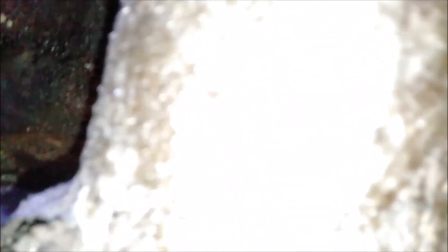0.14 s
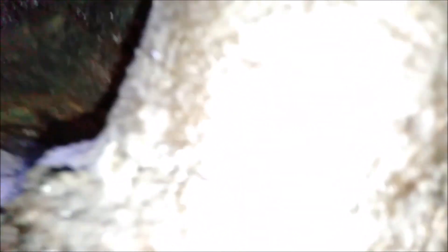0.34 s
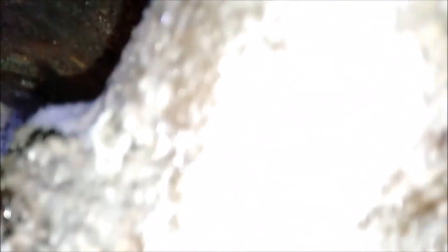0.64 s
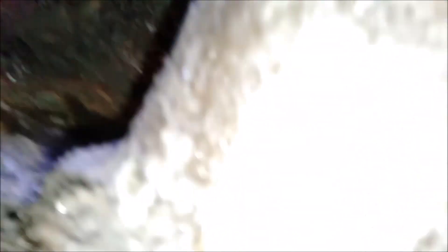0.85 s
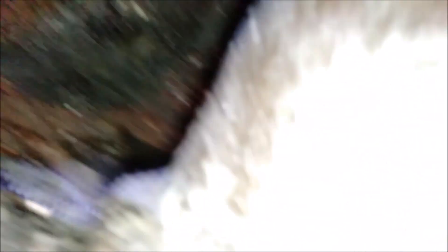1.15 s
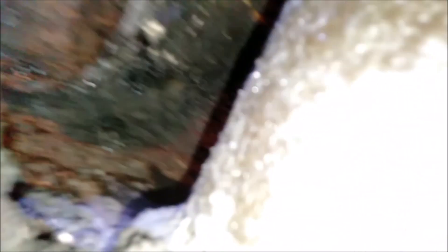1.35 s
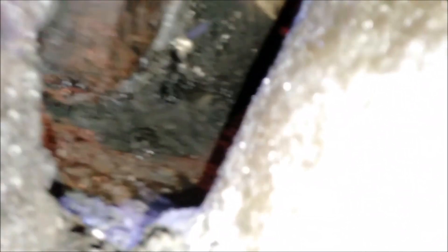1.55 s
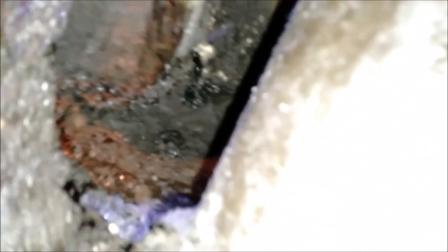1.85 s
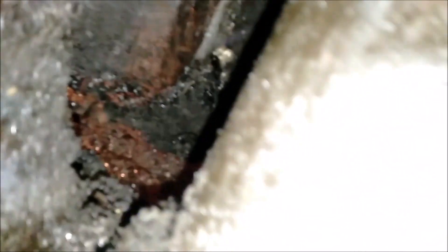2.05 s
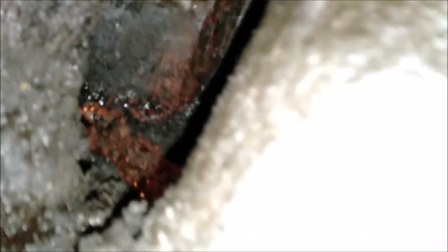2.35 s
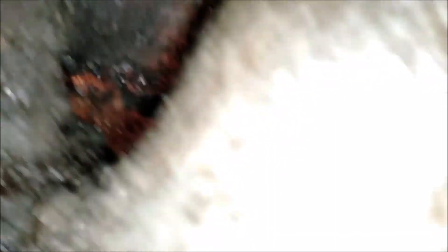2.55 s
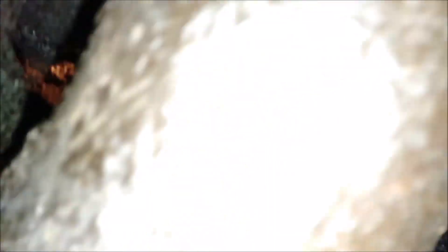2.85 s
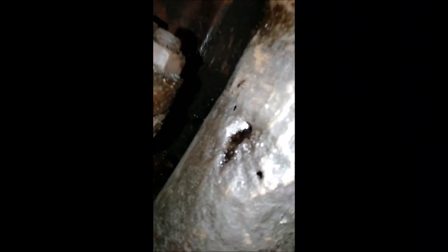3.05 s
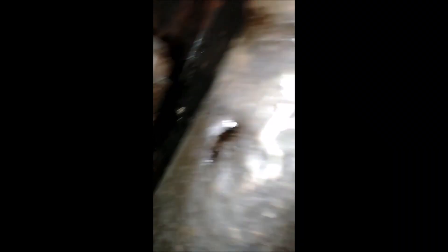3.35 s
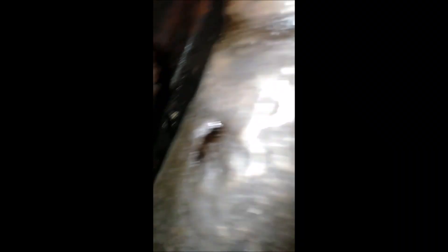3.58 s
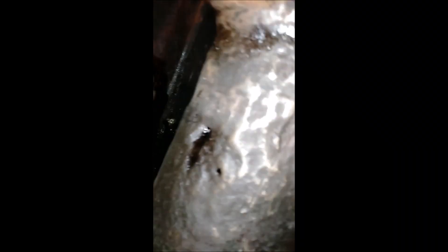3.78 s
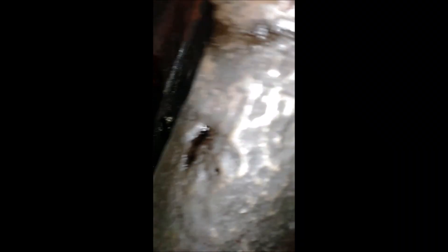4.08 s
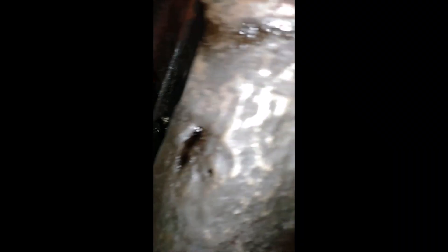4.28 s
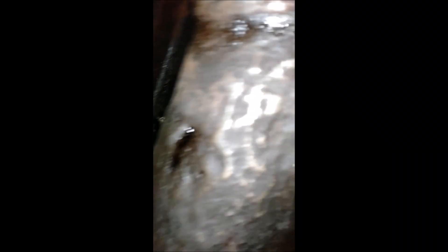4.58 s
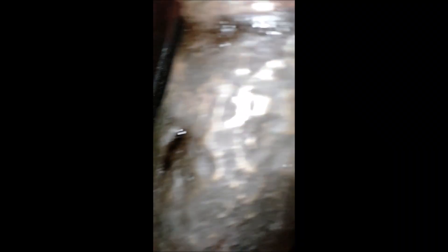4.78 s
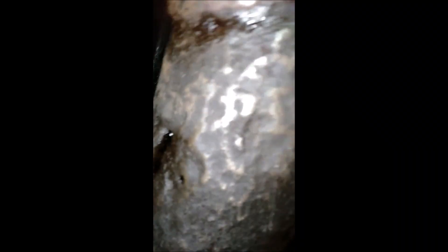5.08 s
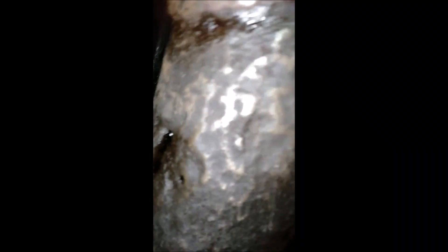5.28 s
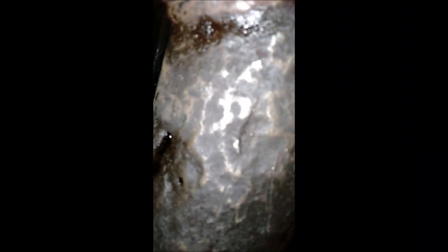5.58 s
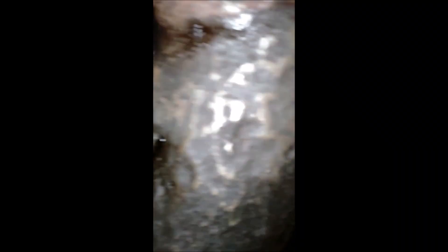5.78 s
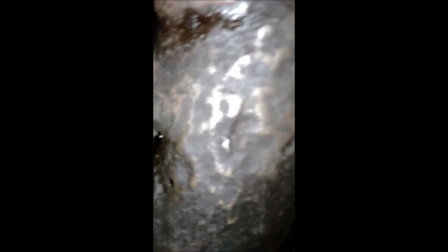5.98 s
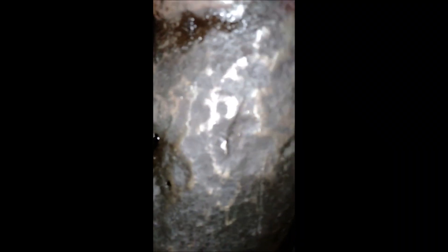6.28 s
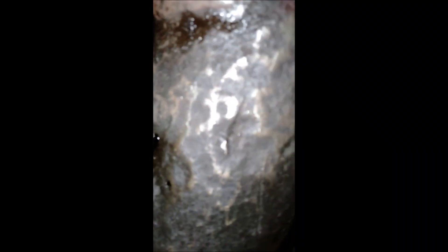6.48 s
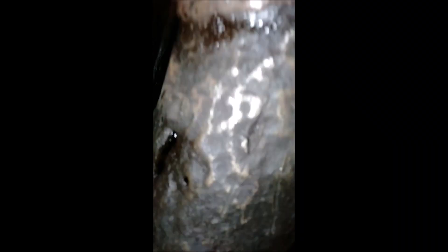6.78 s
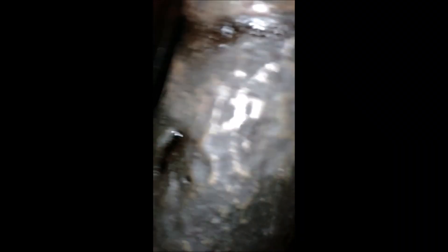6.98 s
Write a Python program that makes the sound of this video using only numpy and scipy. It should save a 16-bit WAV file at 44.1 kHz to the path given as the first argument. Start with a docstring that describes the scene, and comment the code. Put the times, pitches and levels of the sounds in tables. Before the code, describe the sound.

A diesel engine drones loudly up close with valve clatter and hiss, cuts to brief silence, then two engines rumble together, duller and boomier.

```python
"""A diesel drones close by in a ship's engine room, its cycle repeating about six times a second
under valve clatter and hiss; after a short silence comes a duller second scene, where a slow and
a faster diesel beat together over booming rumble. Engines are tones locked to a shaft plus cyclic
and random forces ringing through casings and panels; hiss is coloured noise."""
import sys
import numpy as np
from scipy import signal
from scipy.fft import rfft, irfft
from scipy.io import wavfile
from scipy.ndimage import uniform_filter1d, minimum_filter1d

SR = 44100
rng = np.random.default_rng(int(sys.argv[2]) if len(sys.argv) > 2 else 0)


def put_to_file(sound):
    """Save the sound as 16-bit audio at rate SR, in the file named by the first command-line argument."""
    columns = np.atleast_2d(sound).T  # one column per channel
    safe = np.clip(columns, -1, 1)
    whole_steps = np.round(safe * 32767)
    wavfile.write(sys.argv[1], SR, whole_steps.astype(np.int16))


N = 314428
TIME = np.arange(N) / SR
FREQS = np.fft.rfftfreq(N, 1 / SR)
NEAR_END_S, DULL_START_S = 2.995, 3.2665
WAVER_DB = 1.7   # spread of a tone's level


def near_diesel():
    """One close engine and its pump motors: shaft tones, casing din and sizzle, with bands that swell and ebb."""
    cycle_hz = 5.957   # four-stroke cycles
    # Engine orders that stand out as tones. Each row: multiple of the cycle rate, relative level in dB.
    strong_orders = [(5, -38), (10, -40), (12, -34), (14, -35), (18, -30), (20, -33), (21, -35.5),
                     (22, -37), (24, -32.5), (25, -40), (36, -34.5), (39, -39), (42, -30), (69, -41),
                     (72, -41), (75, -42), (78, -40), (82, -34), (84, -31.5), (87, -36), (89, -40.5),
                     (90, -38.5), (94, -39.5), (98, -41), (99, -36.5), (105, -41.5), (140, -44), (149, -46),
                     (160, -43), (162, -42)]
    # Steady tones at fixed pitch: a line near thirty times the cycle rate, and the tones of the pumps and their
    # motors. Each row: frequency in Hz, relative level in dB.
    steady_tones = [(120, -39.5), (178, -36.5), (207, -36.5), (506.5, -36.5), (609.6, -35.5), (914.5, -43),
                    (2006, -60)]
    # Colour of casings and steel room. Each row: frequency in Hz, relative density in dB per Hz.
    body_colour = [(20, -48.5), (60, -46.5), (135, -44.5), (200, -48.5), (290, -50.5), (370, -53.5),
                   (520, -50), (740, -56), (900, -55), (1300, -60), (1900, -65.5), (2800, -77.5),
                   (4500, -84.5), (8000, -110)]
    # Colour of the air hiss. Each row: frequency in Hz, relative density in dB per Hz.
    hiss_colour = [(2000, -82), (4000, -96.5), (5400, -83.5), (6500, -78.5), (8000, -89.5), (10500, -95.5),
                   (13200, -94), (15600, -82)]
    # Ringing steel panels. Each row: frequency in Hz, width in Hz, lift in dB.
    ringing_panels = [(165, 20, 3), (215, 20, 3), (320, 25, 4), (502, 18, 6), (562, 16, 4), (606, 20, 4),
                      (834, 16, 4), (890, 16, 2.5), (914, 14, 4), (964, 22, 3.5), (1030, 16, 3.5),
                      (1211, 70, 3.5), (1740, 40, 3), (1829, 25, 3), (2006, 45, 2), (2435, 50, 3.5)]
    # Resonances of the opening sizzle. Each row: frequency in Hz, width in Hz, relative level in dB.
    sizzle_bands = [(1800, 500, -41), (2420, 120, -49), (2860, 450, -47), (3500, 400, -55)]
    # Resonances of a brief whistle in the hiss. Each row: frequency in Hz, width in Hz, peak level in dB.
    whistle_bands = [(5420, 140, -56), (6150, 160, -58)]
    # Surges of the drone. Each row: centre in seconds, reach to either side in seconds, lift in dB.
    drone_surges = [(0.34, 0.1, 1.8), (0.97, 0.14, 2.8), (1.25, 0.06, 4), (1.5, 0.1, 4), (1.89, 0.06, 4.3),
                    (2.05, 0.09, 5), (2.32, 0.045, 3.5), (2.48, 0.05, 2.5), (2.8, 0.17, 3)]

    # louder and sizzling at first, then settled
    opening = 1 / (1 + (TIME / 0.6) ** 8)
    # the microphone drifts through a spot where the mids are stronger
    spot = swell(at_s=1.96, reach_s=0.83)
    body_db = -1 + 0.9 * opening
    mid_db = -1.25 + 2.5 * spot
    hiss_db = -2 + 2.3 * opening

    turned = crank(cycle_hz, wander_s=0.00006)
    repeated = shaking(turned, cycle_hz, strong_orders, scatter_db=5.5)
    knocks = clatter(turned, depth=0.21, decay_s=0.0081, uneven_db=1.0)
    engine_tones = from_db(0.27) * hum(turned, strong_orders, WAVER_DB)
    pump_tones = hum(TIME, steady_tones, WAVER_DB)
    sizzle = opening * singing(sizzle_bands)
    whistle = swell(at_s=1.5, reach_s=0.21) * singing(whistle_bands)
    casing_din = din(repeated, knocks, body_colour, ringing_panels, hiss_colour,
                     [body_db, mid_db, hiss_db], flutter_db=0.85)
    engine = engine_tones + pump_tones + sizzle + whistle + casing_din

    # as the microphone moves along the engine, the growl above the drone fades and the bass grows
    from_middle_s = np.minimum(TIME, NEAR_END_S) - NEAR_END_S / 2
    growl_db_per_s, bass_db_per_s = -1.76, 0.9
    engine = rebalanced(engine, (550, 760), growl_db_per_s * from_middle_s)
    engine = rebalanced(engine, (15, 70), bass_db_per_s * from_middle_s)

    # the microphone crosses a node of the room, where the low mids thin out
    node_db, away_db = -2, 2.5
    low_mid_db = away_db + (node_db - away_db) * swell(at_s=1.48, reach_s=0.98)
    engine = rebalanced(engine, (270, 455), low_mid_db)

    between_surges_db = -1.5
    drone_db = between_surges_db + sum(db * swell(s, reach_s) for s, reach_s, db in drone_surges)
    return rebalanced(engine, (475, 520), drone_db)


def two_diesels():
    """Two engines at unrelated speeds: two sets of shaft tones and shared din, with a swelling hum."""
    slow_hz, fast_hz = 4.468, 6.349   # four-stroke cycles
    # Slow engine's tonal orders. Each row: multiple of the cycle rate, relative level in dB.
    slow_orders = [(4, -35), (6, -30), (8, -36), (12, -34), (14, -29.5), (24, -39), (29, -36), (30, -35),
                   (33, -37), (34, -38), (40, -43), (54, -39.5), (58, -43.5)]
    # Fast engine's tonal orders. Each row: multiple of the cycle rate, relative level in dB.
    fast_orders = [(5, -38), (20, -27.5), (24, -41), (36, -31), (38, -41), (40, -42.5), (42, -42.5),
                   (47, -44), (49, -44), (64, -46.5), (72, -51), (96, -57.5)]
    # Colour of casings and steel room. Each row: frequency in Hz, relative density in dB per Hz.
    body_colour = [(15, -48.5), (40, -40), (60, -42.5), (88, -45), (140, -40), (190, -48), (250, -46),
                   (350, -54.5), (500, -56.5), (700, -70), (950, -76), (1650, -72), (2200, -87),
                   (3500, -96.5)]
    # Colour of the air hiss. Each row: frequency in Hz, relative density in dB per Hz.
    hiss_colour = [(1500, -100), (2600, -89), (3450, -86), (4000, -75), (4250, -76.5)]
    # Ringing steel panels. Each row: frequency in Hz, width in Hz, lift in dB.
    ringing_panels = [(134, 13, 6.9), (222, 11, 0.94), (398, 8.2, 1.7), (616, 5.4, 3.1), (1590, 150, 2)]
    # Treble as the microphone moves; only its swing counts. Each row: time in seconds, relative level in dB.
    treble_curve = [(3.45, -51), (5.6, -53.5), (5.91, -56.5), (6.35, -55.5), (6.7, -56), (7.05, -55)]
    # Flare at the top of the hiss. Each row: frequency in Hz, width in Hz, relative level in dB.
    puff_bands = [(4050, 500, -46)]
    # Swells of the hum. Each row: centre in seconds, lift in dB.
    hum_swells = [(3.32, 3.5), (3.9, 4), (4.53, 3.5), (5.38, 2.2), (6.0, 1.4), (6.6, 2.5), (7.07, 3)]

    treble_s, treble_db = np.transpose(treble_curve)
    swing_db = np.interp(TIME, treble_s, treble_db) - np.mean(treble_db)
    # the lower bands follow part of the swing
    body_db = -0.95 + 0.32 * swing_db
    mid_db = -0.37 + 0.52 * swing_db
    hiss_db = -0.8 + swing_db

    slow = crank(slow_hz, wander_s=0.00036)
    fast = crank(fast_hz, wander_s=0.00015)
    slow_shaking = shaking(slow, slow_hz, slow_orders, scatter_db=6.5)
    fast_shaking = shaking(fast, fast_hz, fast_orders, scatter_db=8.5)
    repeated = (slow_shaking + fast_shaking) / np.sqrt(2)
    knocks = clatter(fast, depth=0.22, decay_s=0.006, uneven_db=1.5)

    tones = hum(slow, slow_orders, WAVER_DB) + hum(fast, fast_orders, waver_db=0.0)
    tones = from_db(-0.76) * tones
    deep = shaped(tones, below(85, order=6))
    tones = tones - deep + from_db(1.8) * deep   # throb of the deepest orders

    casing_din = din(repeated, knocks, body_colour, ringing_panels, hiss_colour,
                     [body_db, mid_db, hiss_db], flutter_db=0.47)
    engines = tones + casing_din
    ring_s = 5.57
    # the low mids swell along with the ring
    engines = rebalanced(engines, (300, 450), 2.5 * swell(ring_s, reach_s=0.48))
    # the hum's upper octave starts strong and settles
    engines = rebalanced(engines, (205, 260), 1 * swell(DULL_START_S, reach_s=1))
    between_swells_db = -1.6
    hum_db = between_swells_db + sum(db * swell(s, reach_s=0.12) for s, db in hum_swells)
    engines = rebalanced(engines, (112, 156), hum_db)
    puff = swell(at_s=6.82, reach_s=0.075) * singing(puff_bands)
    return engines + rumble() + puff + passing_ring(ring_s)


def crank(cycle_hz, wander_s):
    """Cycles turned so far; the governor lets the shaft run slightly early and late."""
    return cycle_hz * (TIME + wander_s * drift(0.9))


def hum(turned, orders, waver_db):
    """Strong tones locked to a shaft; each may waver as the microphone moves through standing waves."""
    out = np.zeros(N)
    for multiple, db in orders:
        steps = rng.standard_normal(16)
        waver = np.interp(TIME, np.linspace(0, TIME[-1], len(steps)), steps)
        tone = np.sin(2 * np.pi * (multiple * turned + rng.random()))
        out += from_db(db + waver_db * waver) * tone
    return np.sqrt(2) * out


def shaking(turned, cycle_hz, strong, scatter_db, size=32768):
    """Forces that return every cycle: a dense comb of orders between the strong ones, as dense as white noise."""
    count = int(SR / 8 / cycle_hz)
    strength = np.r_[0, from_db(scatter_db * rng.uniform(-1, 1, count))]
    strength[[round(multiple) for multiple, db in strong]] = 0
    phase = np.exp(2j * np.pi * rng.random(count + 1))
    cycle = irfft(strength * phase, size)
    # the comb fills a quarter of the spectrum, so half the rms gives unit noise density
    return 0.5 * rms_one(np.interp(turned % 1 * size, np.arange(size), cycle))


def clatter(turned, depth, decay_s, uneven_db, count=12):
    """Envelope of valve and injector knocks, each with its own strength and place, dying in the room."""
    places = (np.arange(count) + rng.uniform(-0.25, 0.25, count)) / count
    strength = from_db(uneven_db * rng.standard_normal(count))
    cycle_s = TIME[-1] / (turned[-1] - turned[0])
    grid = np.linspace(0, 1, 1024)
    age_s = ((grid - places[:, None]) % 1) * cycle_s
    knocks = strength @ np.exp(-age_s / decay_s)
    return rms_one(np.interp(turned % 1, grid, 1 + depth * knocks))


def din(repeated, knocks, body, panels, hiss, levels_db, flutter_db):
    """Repeating forces and turbulence ring through the casings; the upper bands pulse with the knocks."""
    # Part of the din that is the same in every cycle. Each row: frequency in Hz, share of power (0-1).
    repeating_share = [(30, 0.16), (150, 0.5), (500, 0.58), (1000, 0.45), (1900, 0.31), (3500, .03)]
    body_gain, mid_gain, hiss_gain = from_db(levels_db)
    share = np.clip(at_hz(repeating_share), 0, 1)
    turbulence = shaped(rng.standard_normal(N), np.sqrt(1 - share))
    force = shaped(repeated, np.sqrt(share)) + turbulence
    casing = shaped(coloured(force, body), steel(panels))
    low = shaped(casing, below(760, order=4))
    air = coloured(rng.standard_normal(N), hiss)
    flutter = from_db(flutter_db * drift(18))
    upper = (casing - low) * mid_gain + air * hiss_gain
    return low * body_gain + knocks * flutter * upper


def steel(panels, count=1000):
    """Gain of the steel room: a few strong panel resonances on a ripple of countless weak ones."""
    ripple_db = 1.7
    grid = np.linspace(0, SR / 2, count)
    ripple = np.interp(FREQS, grid, rng.standard_normal(count)) * below(2900, order=2)
    lift_db = sum(db / (1 + (2 * (FREQS - hz) / width_hz) ** 2) for hz, width_hz, db in panels)
    return from_db(lift_db + ripple_db * ripple * (1 - below(420, order=2)))


def singing(rows):
    """Hiss ringing in a few resonances."""
    return sum(from_db(db) * resonance(hz, width_hz) for hz, width_hz, db in rows)


def rumble():
    """Each boom is a short swell of a sine at its own deep, unsteady pitch."""
    # Booms. Each row: centre in seconds, reach to either side in seconds, pitch in Hz, relative level in dB.
    booms = [(3.67, 0.07, 35, -24), (3.89, 0.14, 44, -22), (4.47, 0.11, 28, -20), (4.78, 0.11, 28, -24.5),
             (5.03, 0.06, 45, -23), (5.16, 0.08, 26, -24), (5.39, 0.13, 33, -21), (5.73, 0.1, 51, -22),
             (6.62, 0.12, 28, -26), (7.03, 0.11, 44, -22)]
    waver_hz = 3
    out = np.zeros(N)
    for s, reach_s, hz, db in booms:
        turned = np.cumsum(hz + waver_hz * drift(8)) / SR + rng.random()
        out += from_db(db) * swell(s, reach_s) * np.sin(2 * np.pi * turned)
    return np.sqrt(2) * out


def passing_ring(at_s):
    """A rough ring builds slowly, narrows to a thin tone at its top and dies quickly."""
    centre_hz, waver_hz, rough_width_hz = 1192, 10, 90
    rise_s, fall_s = 0.26, 0.11
    tone_db, rough_db = -47, -48.5   # rms at the top
    hz = centre_hz + waver_hz * drift(25)
    envelope = swell(at_s, np.where(TIME < at_s, rise_s, fall_s))
    sine = np.sqrt(2) * np.sin(2 * np.pi * np.cumsum(hz) / SR)
    tone = from_db(tone_db) * envelope ** 2 * sine
    rough = from_db(rough_db) * envelope * resonance(centre_hz, rough_width_hz)
    return tone + rough


def click():
    """One sharp click early in the second scene: a rise, a sign flip and a decay."""
    age_s = TIME - 3.3037
    return from_db(-13.5) * -np.sign(age_s) * np.exp(-np.abs(age_s) / 0.0011)


def swell(at_s, reach_s):
    """A smooth Gaussian rise and fall, 1 at its top."""
    return np.exp(-((TIME - at_s) / reach_s) ** 2)


def rebalanced(x, band_hz, lift_db):
    """Raise and lower one band of a sound."""
    low_hz, high_hz = band_hz
    band = shaped(x, below(high_hz, order=40) * (1 - below(low_hz, order=40)))
    return x + (from_db(lift_db) - 1) * band


def resonance(hz, width_hz):
    """Noise ringing in one resonance, rms 1."""
    return rms_one(shaped(rng.standard_normal(N), 1 / (1 + (2 * (FREQS - hz) / width_hz) ** 2)))


def drift(rate_hz):
    """Slow chance with a spread of 1: low-passed noise."""
    return rms_one(shaped(rng.standard_normal(N), below(rate_hz, order=2)))


def coloured(white, spectrum):
    """Give unit white noise a spectrum in dB per Hz."""
    return shaped(white, from_db(at_hz(spectrum)) * np.sqrt(SR / 2))


def at_hz(points):
    """A table read at every frequency, on a log axis."""
    hz, value = np.transpose(points)
    return np.interp(np.log(FREQS + 1e-3), np.log(hz), value)


def shaped(x, gain):
    """Filter by a gain per frequency."""
    return irfft(rfft(x) * gain, N)


def below(hz, order):
    """Gain of a Butterworth-shaped low-pass."""
    return 1 / np.sqrt(1 + (FREQS / hz) ** (2 * order))


def from_db(db):
    """Decibels to gain."""
    return 10 ** (np.asarray(db) / 20)


def rms_one(x):
    """Scale to unit power."""
    return x / np.sqrt(np.mean(x ** 2) + 1e-20)


def scene():
    """The near engine, a silence, then the two engines with their treble cut."""
    both = np.array([near_diesel(), two_diesels() + click()])
    # the microphone sheds the deepest bass
    high_pass = signal.butter(2, 12, "high", fs=SR, output="sos")
    near, dull = signal.sosfilt(high_pass, both)
    fade_s = [DULL_START_S, DULL_START_S + 0.002, TIME[-1] - 0.003, TIME[-1]]
    opened = np.interp(TIME, fade_s, [0, 1, 1, 0])
    dull = shaped(dull * opened, below(4270, order=200))
    return (near * (TIME < NEAR_END_S) + dull)[None]


def record(dry):
    """A quick limiter holds the peaks down; the top is cut."""
    ceiling, reaction_s = 0.49, 0.008   # ceiling as a share of full scale
    size = int(reaction_s * SR)
    gain = minimum_filter1d(ceiling / np.maximum(np.abs(dry[0]), ceiling), 2 * size)
    gain = uniform_filter1d(uniform_filter1d(gain, size), size)
    return shaped(dry[0] * gain, below(15750, order=150))[None]


dry = scene()
out = record(dry)
put_to_file(out)
```